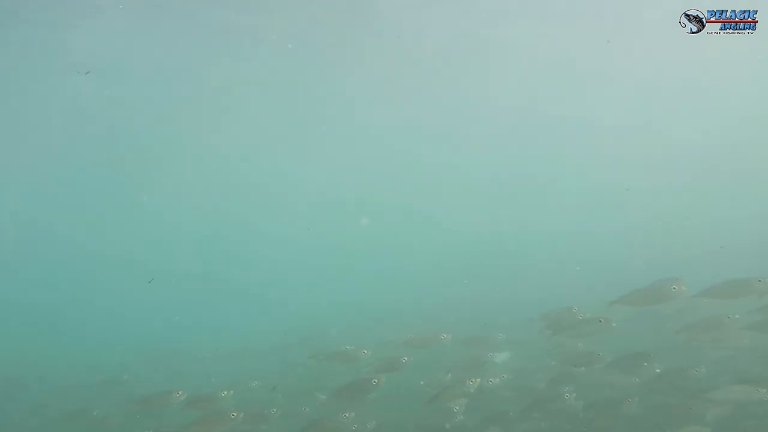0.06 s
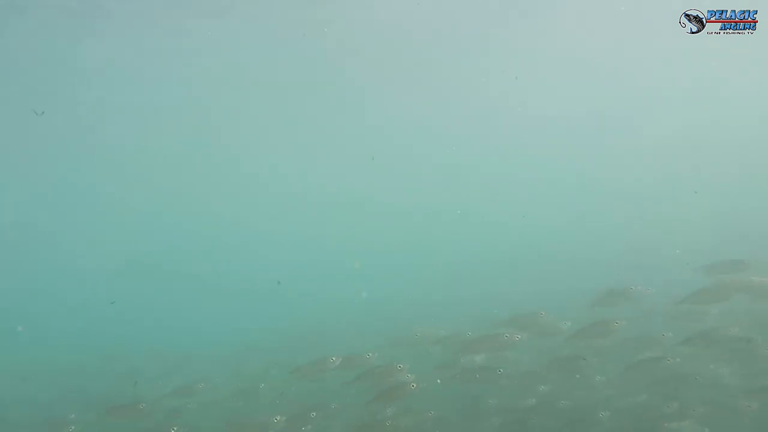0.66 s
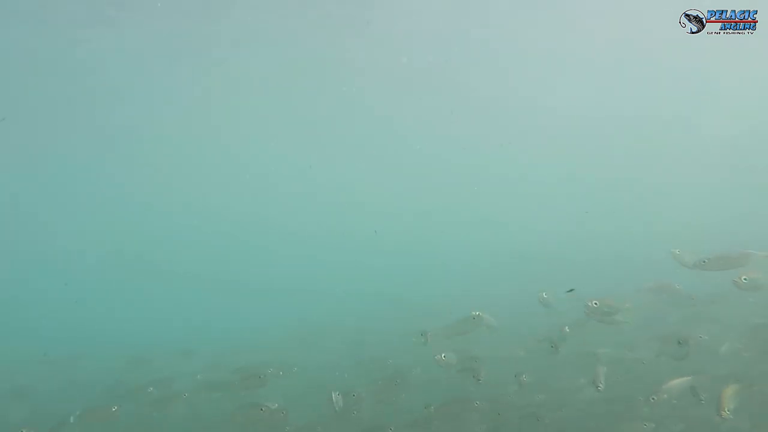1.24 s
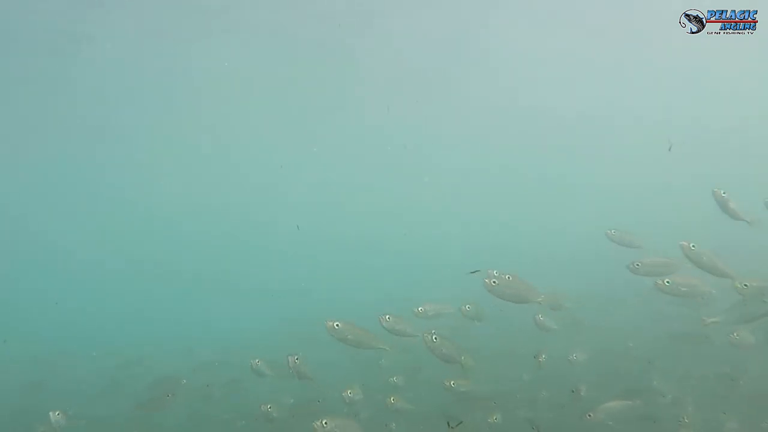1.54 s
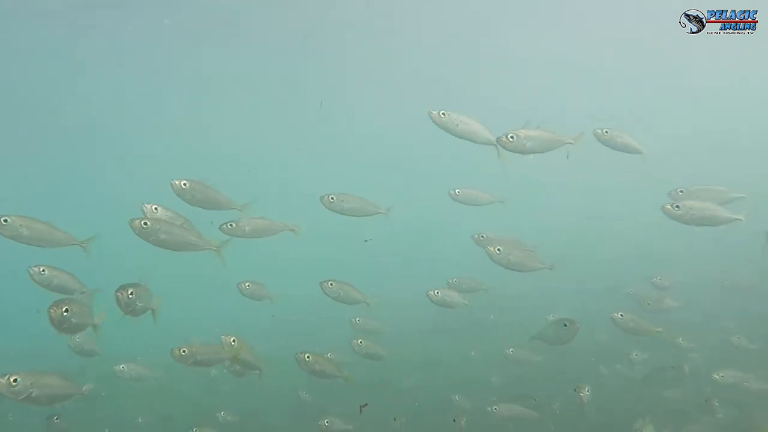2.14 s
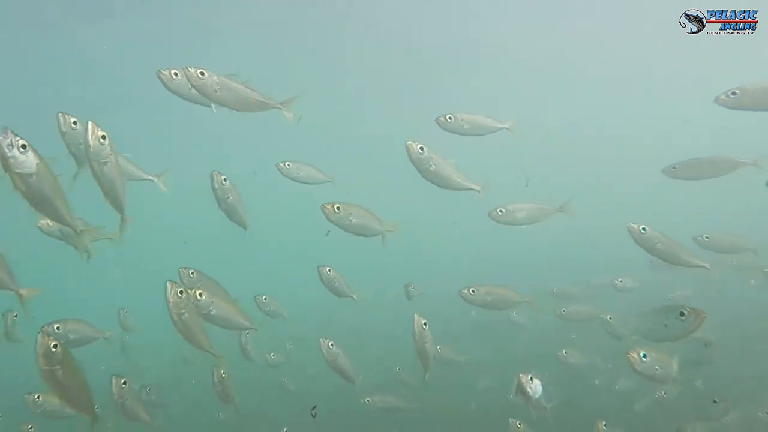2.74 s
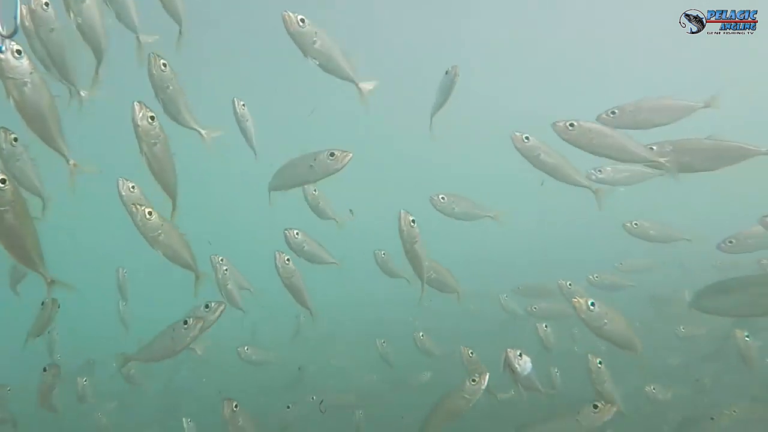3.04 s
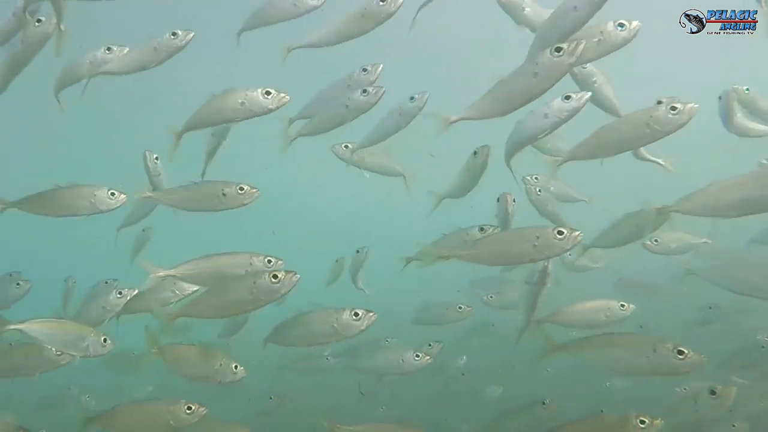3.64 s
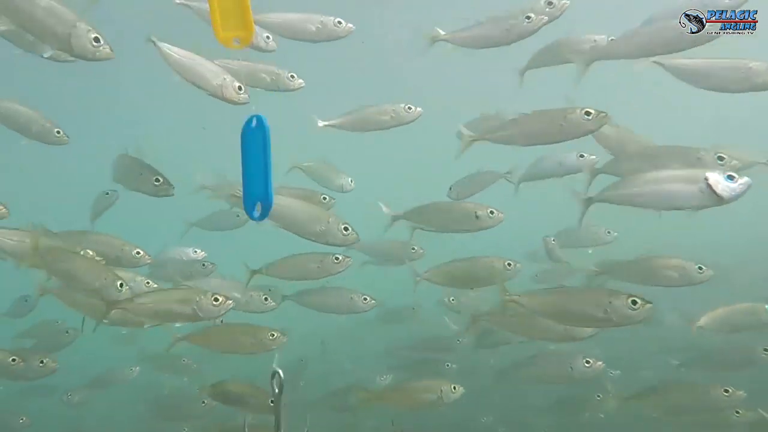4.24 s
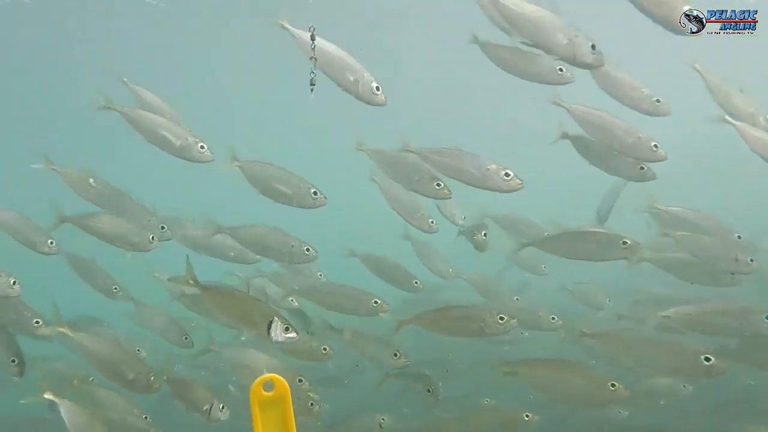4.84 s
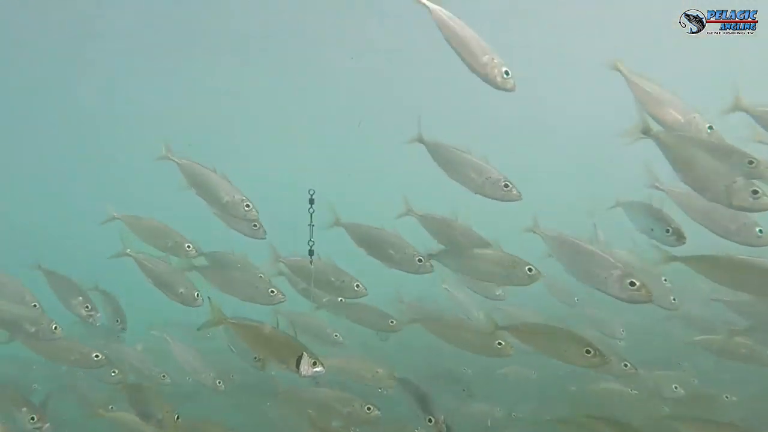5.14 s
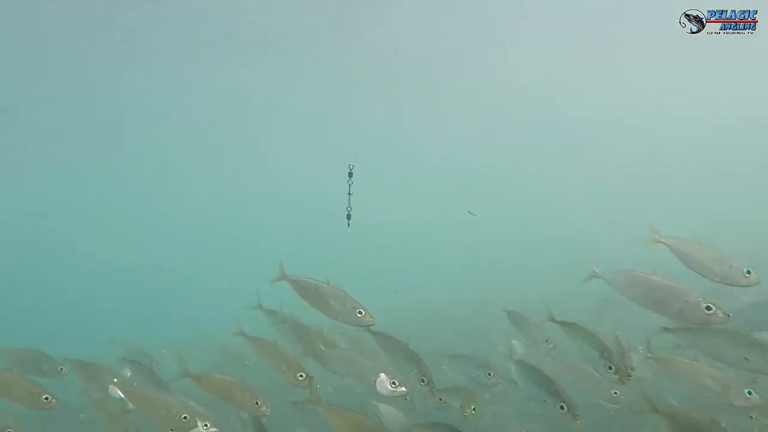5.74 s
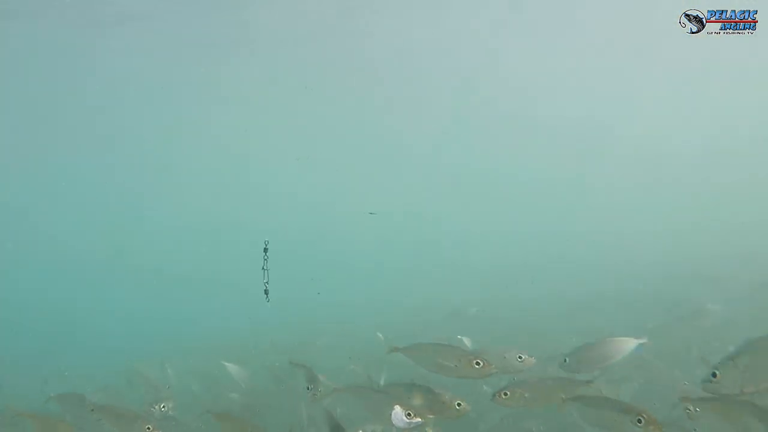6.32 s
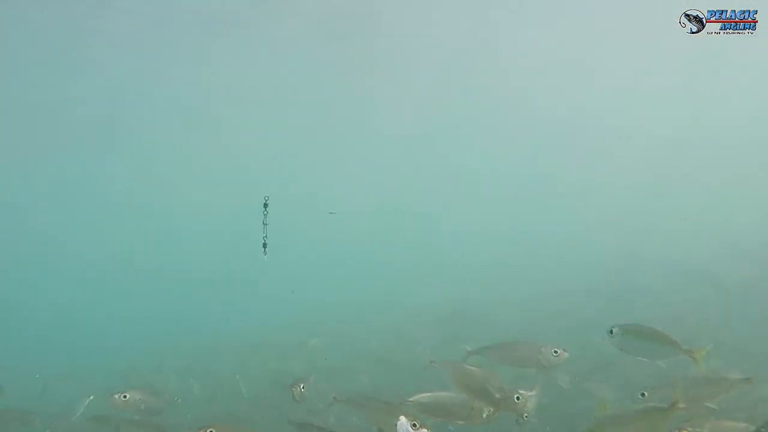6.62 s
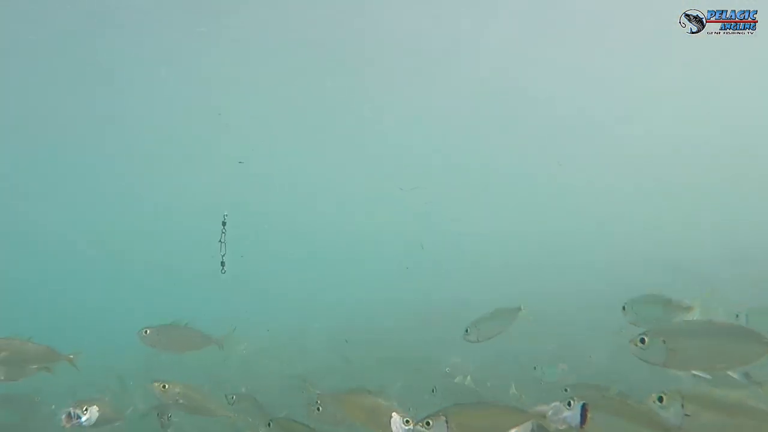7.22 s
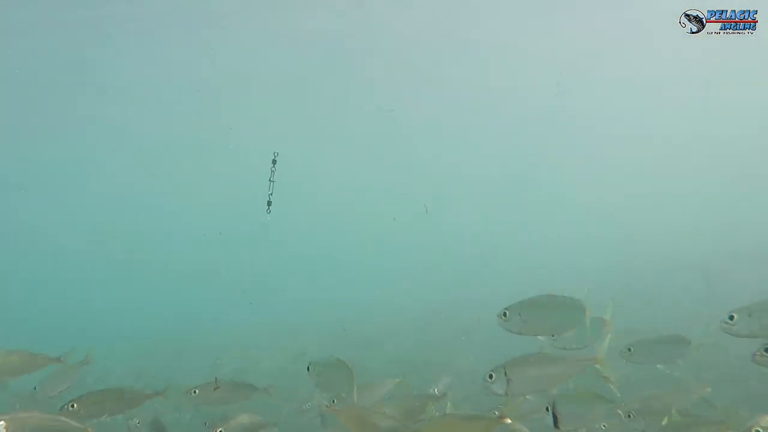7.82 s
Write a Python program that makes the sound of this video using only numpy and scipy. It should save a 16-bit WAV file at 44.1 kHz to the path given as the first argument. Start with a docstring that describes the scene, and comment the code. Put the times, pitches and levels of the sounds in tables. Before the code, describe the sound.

Water rumbles past a submerged camera hanging on a fishing line. The line ticks and rasps, air gurgles out briefly, and small fish bump the rig with low thuds. Then the line tightens into a shuddering hum with a thin whine, while sharp clicks and dry snaps build to one hard clack on the housing. The hum fades under lighter ticks, and distant shrimp crackle faintly throughout.

```python
"""A fishing line under the sea ticks, then hums and whistles, shaking the camera housing it carries.
Ticks travel down the line and ring the housing's modes; once taut, the line shudders and slips in the flow.
Water rumbles past, small fish bump the rig, air gurgles out, bubbles ring and distant shrimp crackle.
Short dry bursts snap, and one hard clack strikes the housing. The sound opens from mono to stereo."""
import sys
import numpy as np
from scipy import signal
from scipy.fft import rfft, irfft, next_fast_len
from scipy.io import wavfile
from scipy.ndimage import uniform_filter1d, minimum_filter1d, map_coordinates

SR = 44100
rng = np.random.default_rng(int(sys.argv[2]) if len(sys.argv) > 2 else 0)


def wrap_up_sound(samples):
    """Save the sound to the file named by the first command line argument, as 16-bit audio."""
    columns = np.atleast_2d(samples).T
    # keep every value between -1 and 1, then stretch to whole-number steps
    tamed = np.clip(columns, -1, 1)
    steps = np.round(tamed * 32767).astype(np.int16)
    wavfile.write(sys.argv[1], SR, steps)


N = 347067

# Knocks that ring the housing: the first two are the splash as air gulps out, the rest are ticks down the line.
# Each row: start in seconds, strength in dB, high modes over low modes in dB.
TICKS = [(0.111, -25, -11.5), (0.137, -20.5, -33), (0.245, -27, -5), (0.433, -25.5, -15),
         (0.613, -25, -15), (0.751, -24.5, -18), (0.863, -26.5, -9.5), (0.953, -31.5, -8),
         (1.035, -30, -9), (1.121, -24, -10), (1.212, -24.5, -10), (1.319, -24, -17),
         (1.423, -23, -18), (1.538, -25.5, -9.5), (1.668, -24, -8.5), (1.789, -21.5, -9.5),
         (1.896, -28.5, -11), (3.591, -21.5, -12), (3.733, -25, -16), (3.851, -26.5, -9),
         (3.991, -23.5, 6.5), (4.22, -22.5, 9), (4.276, -27, -8), (4.325, -32, -19),
         (4.618, -23.5, -7), (4.693, -33, 2), (4.876, -36.5, 10), (5.045, -44, 2), (5.19, -35.5, -1),
         (5.27, -37.5, -2), (5.586, -15, 14), (5.703, -42, 20), (5.753, -27, 6.5), (5.94, -10, 14.5),
         (6.086, -31, -2), (6.111, -42, 12), (6.692, -7, 15), (6.833, -16.5, 3.5), (6.933, -20, 1.5),
         (7.027, -19, 3), (7.131, -23.5, 5), (7.24, -25.5, 6), (7.327, -26, 0.5), (7.41, -31, -6),
         (7.498, -26, -3), (7.589, -26, -4), (7.691, -25, -2.5), (7.796, -24, -5)]
# Each row: time in seconds, slackness of the line (0 taut, 1 slack).
LINE_SLACK = [(3.6, 1), (3.95, 0), (7.3, 0), (7.8, .4)]
# Spectra of a snap's body, its sparkle and the scraping line. Each row: frequency in Hz, gain in dB.
SNAP_BODY_SPECTRUM = [(2500, -42), (4000, -4), (5600, 4.5), (7000, -2), (8200, -34)]
SPARKLE_SPECTRUM = [(6500, -11.5), (8000, 4), (9600, 3), (12000, -10.5), (15000, -35)]
SCRAPE_SPECTRUM = [(1200, -22.5), (2200, -3), (3200, 10.5), (4300, -2.5), (5800, -3), (7200, 0),
                   (8200, -11), (10000, -8.5), (13000, -31), (15000, -59)]


def amp(db):
    """Decibels to gain."""
    return 10 ** (np.asarray(db) / 20)


def unit(x):
    """Scale to rms 1."""
    return x / np.sqrt(np.mean(np.abs(x) ** 2) + 1e-20)


def curves(rows):
    """One value per sample for each column after the time."""
    times_s, *columns = np.transpose(rows)
    return [np.interp(np.arange(N) / SR, times_s, column) for column in columns]


def wobble(rate_hz):
    """A smooth random curve with knots at rate_hz."""
    knots = rng.standard_normal(int(N * rate_hz / SR) + 4)
    return map_coordinates(knots, [np.arange(N) * rate_hz / SR])


def swell(peak_s, hold_s, attack_s, t60_s):
    """An envelope that rises to 1 at peak_s, holds and dies away."""
    t = np.arange(N) / SR - peak_s
    return np.clip(1 + t / attack_s, 0, 1) ** 2 * amp(-60 * np.clip((t - hold_s) / t60_s, 0, 3))


def grains(per_s, scatter_db, rise_s):
    """An envelope of rms 1: random short swells, a few much stronger than the rest."""
    position, chance = rng.random((int(per_s * N / SR), 2)).T
    rarity = -np.log(np.maximum(chance, .04))
    hits = np.bincount((position * N).astype(int), amp(scatter_db * rarity), N)
    age = np.arange(SR // 25) / SR / rise_s
    return unit(signal.fftconvolve(hits, age * np.exp(-age))[:N])


def filtered(x, response):
    """Filter x by a function of frequency in Hz."""
    size = next_fast_len(N + SR // 2)
    return irfft(rfft(x, size) * response(np.fft.rfftfreq(size, 1 / SR)), size)[..., :N]


def coloured(x, spectrum):
    """Filter x by (Hz, dB) points joined on a log frequency axis."""
    points_hz, db = np.transpose(spectrum)
    return filtered(x, lambda hz: amp(np.interp(np.log(hz + 1), np.log(points_hz + 1), db)))


def noise(spectrum):
    """Coloured noise of rms 1."""
    return unit(coloured(rng.standard_normal(N), spectrum))


def spread(spectrum, side):
    """Coloured noise at both ports, plus a share in opposite phase."""
    return noise(spectrum) + side * noise(spectrum) * np.array([[1], [-1]])


def ports(x, phase_rad):
    """One vibration at both ports of the housing, phase-shifted at the right one."""
    analytic = signal.hilbert(x, next_fast_len(N))[:N]
    return np.array([x, np.real(analytic * np.exp(1j * phase_rad))])


def add(track, start_s, sound):
    """Mix a sound in at start_s."""
    part = track[..., round(start_s * SR):][..., :sound.shape[-1]]
    part += sound[..., :part.shape[-1]]


def water():
    """The flow and its surges rumble, churn and rush on the housing; the sea washes and fizzes around."""
    # Each row: time in seconds, level in dB.
    flow_levels = [(0, -28), (.38, -29), (.56, -23.5), (1.2, -20), (1.38, -34.5), (1.6, -15), (1.85, -22),
                   (2.15, -27), (2.72, -32), (3.1, -26), (3.66, -28), (3.84, -20.5), (4.5, -23.5),
                   (5.25, -25.5), (5.6, -30), (6.75, -29), (7.1, -37), (7.87, -28)]
    rush_levels = [(1.6, -63), (2.4, -54.5), (3.4, -52.5), (3.9, -52.5), (4.6, -68), (5.2, -85)]
    # Each row: time in seconds, wash in dB, fizz in dB.
    sea_levels = [(0, -48.5, -57.5), (2.15, -50, -57), (2.45, -56.5, -61.5), (3.0, -54.5, -58.5),
                  (3.5, -55, -59.5), (3.8, -52.5, -57.5), (4.6, -56.5, -60), (5.25, -57, -60.5),
                  (5.65, -61, -60), (6.0, -57, -57), (6.55, -73, -60), (7.1, -64, -64), (7.48, -51, -60.5),
                  (7.87, -50, -57.5)]
    # Each row: peak time in seconds, hold in seconds, rumble in dB, churn in dB.
    surges = [(0.465, 0.067, -13.5, -30), (0.86, 0.032, -16, -40), (1.31, 0.15, -36, -27.5),
              (1.481, 0.059, -14.5, -32.5), (1.988, 0.023, -14, -46), (2.218, 0.05, -17.5, -25.5),
              (2.365, 0.17, -14.5, -44), (2.876, 0.074, -18.5, -47), (3.05, 0.075, -24, -26),
              (3.199, 0.021, -16.5, -35)]
    # Each row: frequency in Hz, relative spectral density in dB.
    rumble_spectrum = [(10, -3.5), (22, -1), (33, 2), (48, -5.5), (70, -9.5), (100, -16.5), (160, -38),
                       (300, -64), (600, -115)]
    churn_spectrum = [(50, -6.5), (100, -1), (150, 5), (220, 0), (300, -8.5), (450, -23), (700, -32),
                      (1500, -70)]
    wash_spectrum = [(200, -16), (420, -1.5), (600, 6), (800, -0.5), (1300, -0.5), (1800, -3.5),
                     (2600, -10), (3500, -44), (6000, -38.5)]
    fizz_spectrum = [(1650, -8.5), (2800, 5), (3680, 1.5), (4620, 3), (5180, 3.5), (5980, 3), (7360, -4.5),
                     (8250, -6.5), (9390, -1), (11200, -9.5), (13400, -14.5), (14400, -71), (15500, -38)]
    rush_spectrum = [(430, -28), (550, -3), (1000, -1.5), (1200, -4), (1480, -2), (1680, -29), (3000, -58)]
    flow_db, = curves(flow_levels)
    wash_db, fizz_db = curves(sea_levels)
    rumble_gain = amp(flow_db)
    churn_gain = amp(-26 + .45 * flow_db)  # grows more slowly than the rumble
    for peak_s, hold_s, rumble_db, churn_db in surges:
        surge = swell(peak_s, hold_s, attack_s=.029, t60_s=.37)
        rumble_gain = np.maximum(rumble_gain, amp(rumble_db) * surge)
        churn_gain = np.maximum(churn_gain, amp(churn_db) * surge)
    eddies_db = 2.6 * wobble(25)
    rumble = rumble_gain * spread(rumble_spectrum, side=.45)
    churn = churn_gain * amp(eddies_db) * spread(churn_spectrum, side=.39)
    wash = amp(wash_db + 1.36 * wobble(9.8)) * spread(wash_spectrum, side=.15)
    fizz = amp(fizz_db) * spread(fizz_spectrum, side=.086)
    rush = amp(curves(rush_levels)[0]) * noise(rush_spectrum)
    return rumble + churn + wash + rush + fizz


def shrimp():
    """Distant shrimp crackle throughout."""
    clicks = amp(-69) * grains(per_s=50, scatter_db=5.5, rise_s=.0008)
    hiss = spread(SNAP_BODY_SPECTRUM, side=.37) + .84 * spread(SPARKLE_SPECTRUM, side=.27)
    return clicks * hiss


def pings():
    """Faint, short pings near 6.5 kHz come at random."""
    # Each row: frequency in Hz, gain in dB.
    spectrum = [(3000, -30), (5700, -10), (6500, 6), (7200, -12), (9400, -2), (12000, -25), (15000, -50)]
    return amp(-70) * grains(per_s=22, scatter_db=5, rise_s=.0016) * noise(spectrum)


def gurgle():
    """Tiny bubbles, each a few cycles that rise in pitch."""
    # Each row: time in seconds, level in dB.
    levels = [(0, -61), (.37, -58), (.45, -42.5), (.75, -48), (1.0, -46), (1.35, -44.5), (1.6, -51),
              (2.1, -46), (2.4, -59), (3.3, -60.5), (3.7, -44.5), (4.3, -47.5), (4.8, -80)]
    bubbles_per_s, median_hz, t60_cycles = 90, 404.5, 20.5
    out, t = np.zeros(N), np.arange(SR // 10) / SR
    count = int(bubbles_per_s * N / SR)
    for start_s, (pitch, strength) in zip(rng.random(count) * N / SR, rng.standard_normal((count, 2))):
        cycles = median_hz * np.exp(.307 * pitch) * t
        age = cycles / t60_cycles
        envelope = amp(3 * strength - 60 * age) * (1 - np.exp(-cycles))
        add(out, start_s, envelope * np.sin(2 * np.pi * cycles * (1 + .1 * age)))
    return amp(curves(levels)[0]) * unit(out)


def gulp():
    """Escaping air gurgles briefly."""
    # Each row: frequency in Hz, gain in dB.
    spectrum = [(120, -21), (280, -4.5), (450, -4), (600, 0.5), (850, 1), (1050, -7), (1450, -12.5),
                (1800, -29), (2150, -28), (3000, -67)]
    envelope = swell(peak_s=.116, hold_s=.024, attack_s=.06, t60_s=.11)
    return amp(-31 + 6.4 * wobble(63)) * envelope * noise(spectrum)


def snaps():
    """Short dry noise bursts, dull or sparkling; one is a harsh crackle on the hardest knock."""
    # Each row: start in seconds, relative level in dB, sparkle over body in dB.
    events = [(0.093, -39.5, -0.5), (0.127, -41, -3), (0.67, -34, -17), (1.2607, -39, -3), (1.333, -47, 6),
              (1.429, -41, 2.5), (2.0014, -38, 1.5), (2.4104, -43, 0.5), (3.6533, -36.5, -1.5),
              (3.719, -38, 7), (4.232, -24.5, -15), (4.364, -35.5, -29), (4.4948, -41, -23),
              (4.563, -37, -31), (4.6054, -35, -30), (4.7512, -11.5, -20), (4.858, -46, -22),
              (4.9194, -42, -22), (4.9448, -39, -26), (4.996, -40, -20), (5.021, -31, -26),
              (5.085, -44, -28), (5.118, -37, -5), (5.2616, -35.5, -22), (5.279, -43, -22),
              (5.6417, -37, -20), (6.0184, -39, -22), (6.2518, -42, -22), (6.401, -44, -22),
              (6.412, -42, -23), (6.9118, -44, -20), (7.123, -41.5, -18), (7.223, -46, -6),
              (5.7446, -34.5, -7.5), (6.0438, -26, -9.5), (6.1975, -26, -18), (6.299, -21, -13.5),
              (6.328, -36, -12), (6.546, -37, -21), (6.632, -34, -24), (6.6767, -35, -31),
              (6.6935, -21, -21), (6.753, -40, -24), (6.8207, -31, -19), (6.8807, -38, -19),
              (6.9277, -31, -21), (6.9642, -7, -9), (7.258, -39, -46), (7.438, -40, -1)]
    # The housing's ring, stronger in dull bursts. Each row: frequency in Hz, gain in dB.
    ring_spectrum = [(900, -29), (1600, -9), (2300, -10.5), (3000, 0), (3900, -7), (5000, -33.5)]
    t60_s, tail_t60_s, attack_s = .017, .055, .0018
    body, ring, sparkle = np.zeros((3, 2, N))
    t = np.arange(SR // 16) / SR
    envelope = (amp(-60 * t / t60_s) + .1 * amp(-60 * t / tail_t60_s)) * (1 - np.exp(-t / attack_s))
    for start_s, db, sparkle_db in events:
        hiss = rng.standard_normal(len(t)) + .92 * rng.standard_normal((2, len(t)))
        burst = amp(db + 4) * envelope * hiss
        add(body, start_s, burst)
        add(ring, start_s, amp(-7.5 - .52 * sparkle_db) * burst)
        add(sparkle, start_s, amp(sparkle_db) * burst)
    return (coloured(body, SNAP_BODY_SPECTRUM) + coloured(ring, ring_spectrum)
            + coloured(sparkle, SPARKLE_SPECTRUM))


def rubbing():
    """While slack, the line rasps on the housing with every tick."""
    # Each row: frequency in Hz, relative spectral density in dB.
    spectrum = [(150, -20), (350, 3), (600, 2), (900, -6), (1500, -9), (2200, -13), (3200, -35)]
    slack, = curves(LINE_SLACK)
    envelope = sum(amp(strength_db) * swell(start_s, hold_s=.008, attack_s=.012, t60_s=.09)
                   for start_s, strength_db, _ in TICKS)
    rasp = grains(per_s=500, scatter_db=3, rise_s=.001) * noise(spectrum)
    return amp(-13) * slack * envelope * rasp


def housing_ring(modes, phases_rad, slack, right_db):
    """One group of modes swells and fades at both ports; on a slack line it rings lower and longer."""
    pitch_drop, lengthening, tail_t60_s = .04, .45, .085
    t = np.arange(SR // 10) / SR
    hz, db, swell_s, slack_db = np.transpose(modes)[:, :, None]
    hz = hz * (1 - pitch_drop * slack)
    db = db + slack_db * slack
    swell_s = swell_s * (1 + lengthening * slack)
    detune, scatter_db, stretch = rng.standard_normal((3, len(hz), 1))
    age = t / (swell_s * np.exp(stretch / 10))
    bloom = age ** 2 * np.exp(2 - 2 * age)
    tail = .2 * (1 - np.exp(-age)) * amp(-60 * t / tail_t60_s)
    # The surrounding water blurs each mode's phase.
    blur_rad = .02 * uniform_filter1d(np.cumsum(rng.standard_normal(age.shape), axis=1), size=40)
    phase_rad = 2 * np.pi * hz * (1 + .015 * detune) * (t - swell_s) + blur_rad
    left = amp(db + scatter_db) * (bloom + tail) * np.exp(1j * phase_rad)
    right = amp(right_db) * left * np.exp(1j * np.array(phases_rad)[:, None])
    return unit(np.array([left.sum(0).imag, right.sum(0).imag]))


def ticks():
    """Each tick rings the housing, then returns twice along the rig, weaker and duller."""
    # Housing modes in four groups: low, middle, high, overtones.
    # Each row: frequency in Hz, relative level in dB, swell in seconds, gain on a slack line in dB.
    mode_groups = [
        [(388, 3, 0.00396, 2), (452, 1.5, 0.00309, -2), (614, -3, 0.00485, 4), (722, -12, .004, 3)],
        [(780, 1.5, 0.006, 0), (868, 6, 0.0045, 0)],
        [(1074, 5.5, 0.0018, -10), (1272, 1, .0027, 1), (1370, -1, .0024, -16)],
        [(1530, 2.5, .003, 0), (1830, -6, .0035, 2), (2200, -11, .004, 4)],
    ]
    # Each row: one group's phase shifts at the right port in radians, one per mode.
    port_phases_rad = [
        [2.2, -2.4, -1.8, -2.2],
        [3.0, -2.7],
        [2.0, 1.9, 1.9],
        [2.0, .5, .5],
    ]
    # Each row: time in seconds, middle modes in dB, overtones in dB, both over the low modes.
    balance = [(3.0, -22, -22), (3.55, -13, -18), (3.85, -10, -19), (3.99, 3, -23), (4.62, 11, -27),
               (5.55, 6, -30), (6.69, 6, -30), (6.83, 10.5, -27), (7.8, 0.5, -27)]
    out = np.zeros((2, N))
    middle_db, overtones_db = curves(balance)
    slack, = curves(LINE_SLACK)
    for start_s, strength_db, high_db in TICKS:
        now = round(start_s * SR)
        for k, group_db in enumerate([0, middle_db[now], high_db, overtones_db[now]]):
            ring = housing_ring(mode_groups[k], port_phases_rad[k], slack[now], right_db=4 - k)
            knock = amp(strength_db + group_db - 12.5) * ring
            echo = amp(-9.5 - 3 * k) * knock
            add(out, start_s, knock)
            add(out, start_s + rng.uniform(.006, .011), echo)
            add(out, start_s + rng.uniform(.015, .024), echo / 2)
    return out


def thud(sway_db, thud_db, pitch_ratio):
    """A soft blow: the rig thuds briefly and sways on at a low pitch."""
    # Each row: base frequency in Hz, relative level in dB, t60 in seconds.
    rig_modes = [(140.5, -7, 0.41), (166.4, 2.5, 0.21), (211.5, 1.5, 0.16), (363, -14, 0.085)]
    sway_hz, sway_t60_s = 63, .75
    t = np.arange(SR) / SR
    sway = amp(sway_db - 60 * t / sway_t60_s) * np.sin(2 * np.pi * sway_hz * t)
    ring = 0
    for base_hz, db, t60_s in rig_modes:
        envelope = amp(thud_db + db + 2.3 * rng.normal() - 60 * t / t60_s)
        hz = base_hz * pitch_ratio * (1 + .0298 * rng.normal())
        ring += envelope * np.sin(2 * np.pi * hz * t)
    return sway * (1 - np.exp(-t / .004)) ** 2 + ring * (1 - np.exp(-t / .003)) ** 2


def bumps():
    """Fish bump the rig, and two large bubbles thud low on it; one tug twists it, pushing the two ports in
    opposition."""
    # Each row, and the single tug: start in seconds, sway in dB, thud in dB, pitch ratio. The rows at 5.267 and
    # 5.371 s are large bubbles.
    blows = [(0.111, -28, -24, 1.2), (0.426, -30, -25.5, 1.15), (0.472, -32, -19, 0.96),
             (0.859, -44, -25, 0.98), (1.359, -22, -51, 1.5), (1.452, -16, -17.5, 1.02),
             (1.968, -13.5, -14, 0.98), (2.223, -28, -20, 1.4), (2.233, -4, -3, 0.94),
             (2.51, -20, -20, 0.86), (2.85, -10.5, -16.5, 0.84), (3.073, -5.5, -6, 0.94),
             (3.471, -27, -25.5, 1.27), (3.598, -28, -27.5, 1.3), (3.737, -52, -26.5, 1.3),
             (4.272, -29, -28, 1.3), (4.745, -35, -16, 0.87), (5.178, -40, -31, 1.24),
             (5.267, -27, -27.5, 1.4), (5.371, -50, -28, 1.35), (7.796, -27.5, -27, 0.99)]
    tug = (4.5, -10, -19.5, 4)
    out = np.zeros((2, N))
    for start_s, *blow in blows:
        add(out, start_s, thud(*blow))
    tug_s, *blow = tug
    add(out, tug_s, thud(*blow) * np.array([[.9], [-.8]]))
    return out


def bubbles():
    """Each bubble rings at its own pitch and dies away."""
    # Each row: start in seconds, pitch in Hz, relative level in dB, t60 in seconds.
    events = [(0.112, 820, -16.5, 0.12), (0.135, 245, -8, .04), (0.137, 612, -6.5, 0.125),
              (0.165, 1410, -24, 0.055), (0.168, 1030, -31, .13), (0.188, 835, -31, .15),
              (3.938, 996, -31, .06), (4.773, 1504, -14.5, 0.04), (4.824, 1080, -20.5, 0.029),
              (4.864, 1660, -23, 0.05), (4.877, 1560, -18, 0.04), (5.089, 1130, -12, 0.022),
              (5.112, 1635, -26, 0.062), (5.186, 1000, -17, 0.021), (7.265, 1113, -16, 0.045)]
    out, t = np.zeros(N), np.arange(SR // 5) / SR
    for start_s, hz, db, t60_s in events:
        envelope = amp(db + 1 - 60 * t / t60_s) * (1 - np.exp(-t / .0011))
        add(out, start_s, envelope * np.sin(2 * np.pi * hz * t))
    return ports(out, phase_rad=2.2)


def line_hum():
    """The taut line shudders, rocking the housing so the ports nearly oppose; pitch follows tension."""
    # Each row: time in seconds, level in dB.
    levels = [(3.6, -85), (3.98, -41.5), (4.2, -32), (4.45, -38), (4.7, -31), (5.0, -27.5), (5.35, -28),
              (5.8, -23.5), (6.6, -24.5), (7.12, -29.5), (7.4, -42), (7.87, -54)]
    # Each row: time in seconds, pitch ratio.
    tension = [(4.1, 0.92), (4.8, 1.073), (5.4, 0.98), (6.5, .98), (7.2, 0.96)]
    # Each row: frequency in Hz at pitch ratio 1, gain in dB.
    spectrum = [(300, -25), (700, -22.5), (860, -8), (980, -3), (1080, 1), (1180, -2.5), (1320, -7),
                (1550, -17.5), (1900, -39.5), (3000, -57)]
    # Each row: frequency in Hz, lead of the right port in radians.
    rocking = [(800, 2.877), (1550, 2.43)]
    hum_db, = curves(levels)
    pitch_ratio, = curves(tension)
    shudder = unit(amp(2.5 * wobble(45)) * noise(spectrum))
    left = map_coordinates(shudder, [np.cumsum(pitch_ratio)], mode="mirror")
    right = filtered(left, lambda hz: np.exp(1j * np.interp(hz, *np.transpose(rocking))))
    return amp(hum_db) * np.array([left, right])


def scraping():
    """The taut line scrapes in fine grains."""
    # Each row: time in seconds, level in dB.
    levels = [(3.9, -90), (4.3, -64), (4.95, -57), (5.3, -59), (5.85, -51), (6.25, -54.5), (6.65, -57),
              (6.85, -61), (7.15, -63), (7.6, -80)]
    catches = grains(per_s=140, scatter_db=4.8, rise_s=.0012)
    return amp(curves(levels)[0]) * catches * spread(SCRAPE_SPECTRUM, side=1)


def line_note(path):
    """One unsteady note of the line along (s, Hz, dB) rows."""
    hz, db = curves(path)
    jitter_hz = 23 * (wobble(300) + wobble(30) / 2)
    flutter_db = 4 * (wobble(260) + .7 * wobble(35))
    tone = np.sin(2 * np.pi * np.cumsum(hz + jitter_hz) / SR)
    return amp(db) * unit(amp(flutter_db) * tone)


def groan():
    """The line groans briefly and unevenly as it tightens."""
    # Each row: time in seconds, pitch in Hz, level in dB.
    path = [(3.92, 990, -80), (3.942, 996, -37), (3.98, 1000, -56), (4.09, 1000, -48), (4.12, 1010, -26),
            (4.143, 1010, -42), (4.165, 1030, -26), (4.19, 1070, -31), (4.25, 1090, -85)]
    return ports(line_note(path), phase_rad=2.2)


def squeal():
    """The line slips: a thin whine, a brief lower chirp, whistling side resonances and a rasp."""
    # Each row: time in seconds, pitch in Hz, level in dB.
    whine_path = [(4.44, 3010, -89), (4.51, 3080, -55), (4.56, 3100, -61), (4.63, 3140, -73),
                  (5.39, 3230, -68), (5.43, 3200, -46), (5.49, 3210, -44.5), (5.55, 3225, -35.5),
                  (5.615, 3195, -42), (5.65, 3270, -33.5), (5.685, 3230, -34.5), (5.732, 3240, -53),
                  (5.772, 3270, -36), (5.8, 3260, -43), (5.83, 3185, -39), (5.916, 3190, -45),
                  (6.01, 3185, -38), (6.058, 3195, -49), (6.09, 3390, -57), (6.16, 3420, -55),
                  (6.195, 3430, -45), (6.31, 3420, -57.5), (6.6, 3377, -68), (6.95, 3315, -60),
                  (7.06, 3240, -59), (7.2, 3270, -58), (7.42, 3330, -62.5), (7.6, 3330, -83)]
    chirp_path = [(6.14, 2950, -95), (6.19, 2970, -44), (6.225, 2975, -55), (6.27, 2990, -57),
                  (6.36, 2990, -95)]
    # Each row: centre in Hz and width in Hz at pitch ratio 1, relative level in dB.
    resonances = [(3000, 100, -16), (3320, 280, -8), (3750, 80, -7), (6260, 150, -12.5), (6780, 110, -16),
                  (7070, 100, -11.5), (8830, 130, -15.5), (12400, 160, -28)]
    # They arch as the line tightens and eases. Each row: time in seconds, pitch ratio, gain in dB.
    arch = [(5.45, 0.96, -1), (5.8, 0.99, 3), (6.03, .975, 0), (6.2, .985, -5), (7.1, .985, 4)]
    _, slip_db = curves(whine_path)
    pitch_ratio, arch_db = curves(arch)
    whistle = 0
    for centre_hz, width_hz, db in resonances:
        band = filtered(rng.standard_normal(N), lambda hz: 1 / (1 + (2 * (hz - centre_hz) / width_hz) ** 2))
        whistle += amp(db) * unit(band * amp(3 * wobble(14)))  # each catches and lets go by itself
    whistle = amp(arch_db - 8) * map_coordinates(whistle, [np.cumsum(pitch_ratio)], mode="mirror")
    rasp = amp(-14.5) * grains(per_s=300, scatter_db=4, rise_s=.001) * noise(SCRAPE_SPECTRUM)
    notes = line_note(whine_path) + line_note(chirp_path)
    return ports(notes + amp(slip_db) * (whistle + rasp), phase_rad=.66)


def clack():
    """Something hard strikes the housing itself: a very short, loud ring."""
    # Each row: frequency in Hz, relative level in dB, t60 in seconds, right port's phase in radians.
    modes = [(950, 14, 0.013, 1.8), (1350, 16, 0.019, 2.5), (1620, 2, 0.014, 1.13), (2890, 3, 0.011, 0.95),
             (4000, -9, 0.0056, .5), (6540, -8, 0.0077, .5)]
    start_s, attack_s = 6.9662, .0006
    out, t = np.zeros((2, N)), np.arange(SR // 20) / SR
    for hz, db, t60_s, phase_rad in modes:
        envelope = amp(db + 4 - 60 * t / t60_s) * (1 - np.exp(-t / attack_s))
        add(out, start_s, envelope * np.sin(2 * np.pi * hz * t + np.array([[0], [phase_rad]])))
    return out


def limiter_gain(x, ceiling, release_s=.06):
    """Gain that drops quickly when x tops the ceiling, holds, then creeps back ever more slowly."""
    over_db = 20 * np.log10(np.maximum(np.abs(x).max(0) / ceiling, 1))
    held_db = -minimum_filter1d(-over_db, size=1500, origin=660)
    age = np.arange(N) / SR / release_s
    duck_db = np.exp(np.maximum.accumulate(np.log(held_db + 1e-9) + age) - age)
    return amp(-uniform_filter1d(uniform_filter1d(duck_db, size=80), size=80))


def scene():
    """All sources at the two ports; the crackle is 2 dB stronger on the right."""
    surroundings = water() + bumps() + gulp() + gurgle() + bubbles()
    rig = ticks() + rubbing() + groan() + clack() + line_hum() + squeal()
    crackle = snaps() + shrimp() + pings() + scraping()
    return surroundings + rig + crackle * amp([[-1], [1]])


def record(dry):
    """The left port feeds both channels until the stereo opens; bass and the rest are limited apart."""
    # Each row: time in seconds, width (0 mono, 1 stereo).
    stereo_width = [(3.78, 0), (4.0, 0.86), (4.3, 0.99), (7.2, 1), (7.87, 0.46)]
    crossover_hz, top_hz = 250, 15300
    width = np.clip(curves(stereo_width)[0], 0, 1)
    left, right = dry
    pair = np.array([left, left + width * (right - left)])
    bass = filtered(pair, lambda hz: 1 / (1 + (hz / crossover_hz) ** 4))
    limited = bass * limiter_gain(bass, ceiling=.78) + (pair - bass) * limiter_gain(pair, ceiling=.93)
    return filtered(limited, lambda hz: hz < top_hz)


dry = scene()
out = record(dry)
wrap_up_sound(out)
```